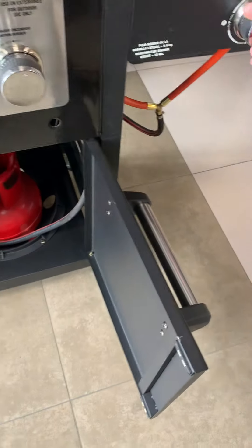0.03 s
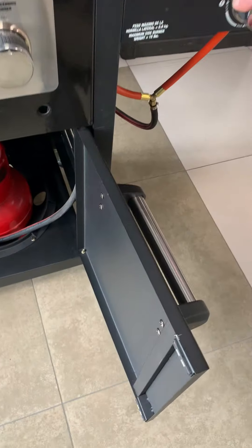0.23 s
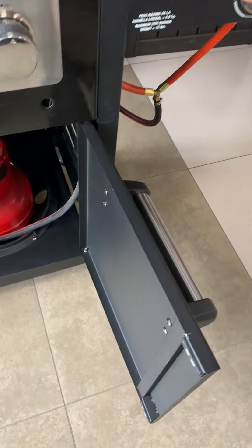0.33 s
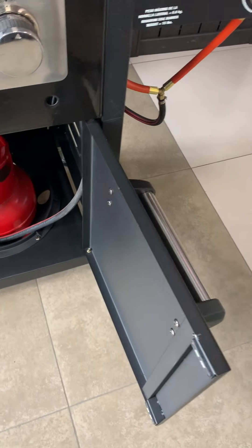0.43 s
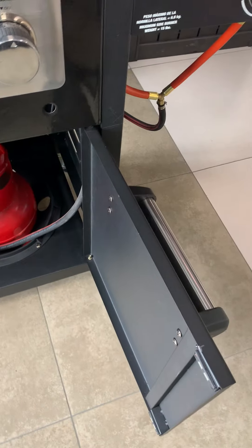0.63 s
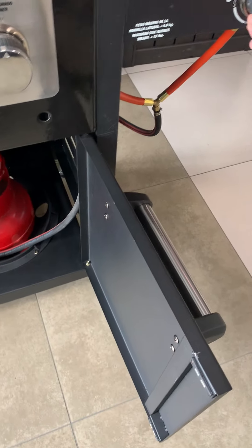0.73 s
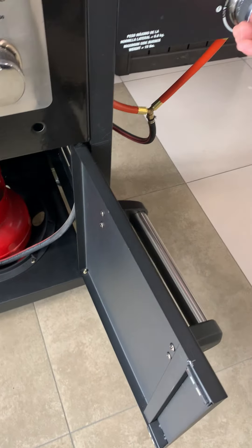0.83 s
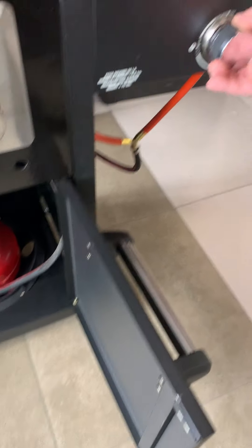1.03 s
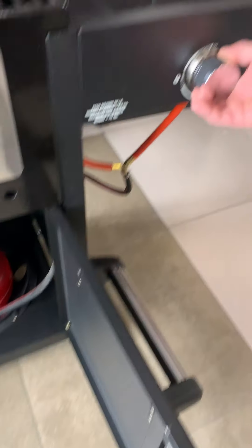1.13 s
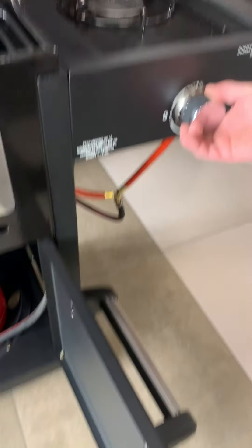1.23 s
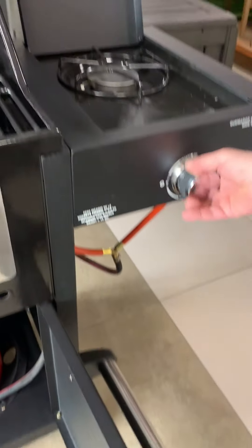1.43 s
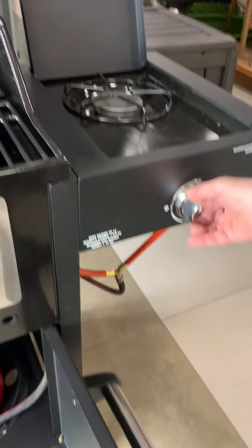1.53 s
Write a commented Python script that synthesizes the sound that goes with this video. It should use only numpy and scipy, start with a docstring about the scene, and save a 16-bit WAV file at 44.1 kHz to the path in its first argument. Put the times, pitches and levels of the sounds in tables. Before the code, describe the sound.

A sheet-steel grill cart clanks heavily, then ticks, clanks lightly and snaps over a low hum.

```python
"""A sheet-steel grill cart, handled in a hard-floored room: one heavy clank, then a tick, a lighter
clank and a sharp snap. Each blow cracks steel on steel and leaves the panels and parts ringing.
A hand then brushes the side shelf and takes hold of its knob. A low machine hum lies underneath.
Two closely spaced microphone ports pick it all up."""
import sys
import numpy as np
from scipy.fft import rfft, irfft, next_fast_len
from scipy.io import wavfile
from scipy.ndimage import map_coordinates

SR = 44100
rng = np.random.default_rng(int(sys.argv[2]) if len(sys.argv) > 2 else 0)


def unload_wav(signal):
    """Save mono or channel-first audio to the path in sys.argv[1] as 16-bit WAV at rate SR, clipped to [-1, 1]."""
    wavfile.write(
        sys.argv[1],
        SR,
        np.round(np.clip(np.atleast_2d(signal).T, -1, 1) * 32767).astype(np.int16),
    )


N = 70560


def amp(db):
    """Decibels to gain."""
    return 10 ** (np.asarray(db) / 20)


def unit(x):
    """Scaled to rms 1."""
    return x / np.sqrt(np.mean(x ** 2) + 1e-20)


def along(points, hz):
    """(Hz, value) points read on a log axis."""
    freqs, values = np.transpose(points)
    return np.interp(np.log(hz + 1), np.log(freqs + 1), values)


def fade(t, t60):
    """Exponential decay by 60 dB in t60 seconds."""
    return np.exp(-np.log(1000) * t / t60)


def since(start):
    """Seconds since start, zero before."""
    return np.maximum(np.arange(N) / SR - start, 0)


def wobble(rate):
    """A smooth random curve, rate knots a second."""
    return map_coordinates(rng.standard_normal(256), [np.arange(N) * rate / SR], mode="wrap")


def filtered(x, response):
    """x through a complex frequency response."""
    size = next_fast_len(N + SR // 2)
    return irfft(rfft(x, size) * response(np.fft.rfftfreq(size, 1 / SR)), size)[..., :N]


# Stereo width of the diffuse sound. Each row: frequency in Hz, correlation between the channels.
CHANNEL_LIKENESS = [(60, .9999), (130, .99), (280, .92), (700, .7), (1500, .75), (2800, .55), (4500, .98),
                    (8000, .98), (15000, .98)]
def noise(spectrum):
    """Coloured stereo noise of rms 1, nearly alike in both channels in bass and treble, wider between."""
    hz = np.fft.rfftfreq(N, 1 / SR)
    spread = np.arccos(np.clip(along(CHANNEL_LIKENESS, hz), -1, 1)) / 2
    coloured = rfft(rng.standard_normal((2, N))) * amp(along(spectrum, hz))
    mid, side = irfft(coloured * [np.cos(spread), np.sin(spread)], N)
    return unit(np.array([mid + side, mid - side]))


# The machine, heard in the room. Each row: pitch in Hz, level in dB.
HUM_TONES = [(31.3, -63), (62.7, -45), (94, -55.5), (156, -58.5), (250, -64.5), (850, -70.5)]
# Room tone. Each row: frequency in Hz, relative density in dB.
ROOM_TONE = [(20, -1), (60, -0.5), (110, -3), (250, -8.5), (500, -14.5), (1000, -27.5), (2000, -30.5),
             (4000, -41), (8000, -58), (15000, -52.5)]
def room_hum():
    """A low machine hum wavers in level and phase over soft room tone."""
    t, hum = np.arange(N) / SR, np.zeros(N)
    for hz, db in HUM_TONES:
        peak = amp(db + 3.1 * wobble(rate=22)) * np.sqrt(2)
        hum += peak * np.sin(2 * np.pi * (hz * t + rng.random()) + 0.2 * wobble(rate=16))
    return hum + amp(-48) * noise(ROOM_TONE)


# Scrapes and brushes on the cart. Each row: peak time, rise and fall in seconds,
# then body, rasp and hiss levels in dB.
STROKES = [(0.037, 0.032, 0.044, -47, -58, -46.5), (0.121, 0.034, 0.18, -52, -64, -59.5),
           (.203, .012, .003, -40, -38, -65), (0.2079, 0.00053, .003, -43, -21.5, -17),
           (1.125, 0.022, 0.16, -55, -65.5, -83.5), (1.222, 0.017, 0.023, -54.5, -61.5, -55),
           (1.424, 0.031, 0.076, -47, -59, -77)]
# The three colours of a rub. Each row: frequency in Hz, relative density in dB.
BODY_SPECTRUM = [(80, -21.5), (250, 8), (500, -4), (900, -1.5), (1400, -16.5), (3500, -27), (16000, -71)]
RASP_SPECTRUM = [(500, -16.5), (1300, 2.5), (2400, 2.5), (3600, 2), (5000, -3), (7500, -13.5),
                 (15000, -30.5)]
HISS_SPECTRUM = [(500, -27), (2000, -12.5), (4000, -2), (7000, 0.5), (9000, -1.5), (11500, -0.5),
                 (15500, -1.5)]
def rubs():
    """Sliding contacts swell and die: a dull body, a rasp and a dry hiss."""
    t, out = np.arange(N) / SR, np.zeros((2, N))
    spectra = [BODY_SPECTRUM, RASP_SPECTRUM, HISS_SPECTRUM]
    for peak_s, rise, fall, *levels_db in STROKES:
        envelope = np.exp(-(np.minimum(t - peak_s, 0) / rise) ** 2 - since(peak_s) / fall)
        out += envelope * sum(amp(db) * noise(colour) for db, colour in zip(levels_db, spectra))
    return out


# The contact before it is dulled. Each row: frequency in Hz, relative density in dB.
CLICK_SPECTRUM = [(300, -15), (1500, -13.5), (4000, -14), (7000, -6), (11000, 1), (13000, -4.5),
                  (15500, 6.5)]
def click(start, cutoff_hz, rise_s=0.0011, fall_s=0.00061):
    """The crack of steel meeting steel, straight to the microphone; softer contacts are duller."""
    t = since(start)
    envelope = (1 - np.exp(-(t / rise_s) ** 2)) * np.exp(-t / fall_s)
    crack = filtered(noise(CLICK_SPECTRUM)[0], lambda hz: 1 / (1 + (hz / cutoff_hz) ** 4))
    return unit(crack) * envelope / envelope.max()


def band(spectrum, centres_hz, k):
    """The sound in band k of a spectrum, crossfaded into the neighbouring bands."""
    hz = np.fft.rfftfreq(N, 1 / SR)
    weight = np.interp(np.log(hz + 1), np.log(centres_hz), np.eye(len(centres_hz))[k])
    return irfft(spectrum * weight, N)


# The panels before a blow sets their band levels. Each row: frequency in Hz, relative density in dB.
PANEL_SPECTRUM = [(60, -19), (110, -14), (160, -4.5), (200, -1), (300, 3), (400, -3.5), (600, -0.5),
                  (900, -0.5), (1400, -9), (1950, -12), (2500, -13.5), (4000, -15), (5000, -14),
                  (7300, -14), (9000, -11), (10600, -12), (13000, -11.5), (15500, -13)]
# Centres of those five bands in Hz, low to high.
PANEL_BANDS = [250, 900, 2800, 7000, 14000]
# The panels' tail. Each row: frequency in Hz, t60 in seconds before stretching.
PANEL_DECAY = [(150, 1), (400, 1), (1000, 0.88), (2500, 0.67), (7000, 0.52), (11000, 0.27), (15000, 0.22)]
# Ringing spreads through the sheet. Each row: frequency in Hz, rise time in seconds.
PANEL_BLOOM = [(150, 0.023), (300, 0.0025), (900, 0.015), (2500, 0.006), (10000, 0.00071)]
def panels(start, stretch, band_db, cluster_db=3, cluster_width_hz=55):
    """Countless sheet-metal modes: the treble starts at once and dies first, the bass lingers."""
    t, out = since(start), np.zeros((2, N))
    hz = np.fft.rfftfreq(N, 1 / SR)
    # The dense modes bunch up unevenly along the spectrum.
    clusters = map_coordinates(rng.standard_normal(2048), [hz / cluster_width_hz], mode="wrap")
    modes = rfft(noise(PANEL_SPECTRUM)) * amp(cluster_db * clusters * np.minimum(hz / 1500, 1))
    gains_db = [db - 10 * np.log10(np.mean(band(modes[0], PANEL_BANDS, k) ** 2))
                for k, db in enumerate(band_db)]
    modes *= amp(along(list(zip(PANEL_BANDS, gains_db)), hz))
    early_gain = amp(1.5)  # a quick first decay, relative to the tail
    early = early_gain * fade(t, t60=0.16 * stretch)
    centres_hz = np.geomspace(150, 15000, 7)
    for k, centre in enumerate(centres_hz):
        tail = fade(t, along(PANEL_DECAY, centre) * stretch)
        bloom = 1 - np.exp(-t / along(PANEL_BLOOM, centre))
        out += band(modes, centres_hz, k) * bloom * (early + tail) / (1 + early_gain)
    return out


def ringing(start, pitches, rings, reflected=0.83):
    """One part's strongest modes; reflections make each swell and fade, the high ones faster."""
    t, out = since(start), np.zeros((2, N))
    direct = np.sqrt(1 - reflected ** 2)
    for hz, (db, t60) in zip(pitches, rings):
        live = (t > 0) & (t < t60)
        age = t[live]
        knots = rng.standard_normal((512, 2)) @ [1, 1j]
        knots_per_s = 20 + 16 * hz / 1000
        waver = np.interp(age * knots_per_s, np.arange(len(knots)), knots)
        tone = np.imag(np.exp(2j * np.pi * hz * age) * (direct + reflected * waver))
        rise_s = 0.0045 * min(1, 1000 / hz)
        out[:, live] += amp(db) * (1 - np.exp(-age / rise_s)) * fade(age, t60) * tone
    return out


# Modes of the sheet-steel body, stiff frame, side shelf and a small steel fitting. PITCHES are in Hz.
# Each row of RINGS: that mode's relative level in dB, t60 in seconds.
BODY_PITCHES = [157, 200, 266, 288, 503, 559, 654, 836, 852, 880, 1179, 1248, 1463, 1601]
BODY_RINGS = [(-11, 0.85), (-8.5, 1), (-12.5, .8), (-6, .55), (-8, .6), (-7.5, 0.71), (-8.5, 0.86),
              (-4.5, 0.42), (3.5, 0.4), (1.5, .35), (-9.5, .45), (-9.5, 0.41), (-12, 0.39), (-12.5, 0.26)]
FRAME_PITCHES = [2258, 2455, 3385, 4045, 6874, 8400, 10162, 10366, 10485, 10650, 11992]
FRAME_RINGS = [(-7, 0.85), (1, 0.25), (-8, 0.8), (5, .27), (-6, 0.25), (-6, .22), (-1, .2), (4, .2),
               (-1.5, .2), (-1.5, .2), (-2.5, .22)]
SHELF_PITCHES = [777, 845, 897, 975, 1255, 1595, 1733, 1905, 6326, 7470]
SHELF_RINGS = [(-1, 0.11), (1, 0.35), (-1.5, 0.23), (3, 0.38), (-3.5, .22), (-9.5, 0.48), (-12, 0.59),
               (-10.5, 0.25), (-12, 0.15), (-7.5, 0.2)]
FITTING_PITCHES = [1290, 1338, 1577, 1655, 3618, 5803, 7171, 7537, 10690, 11390]
FITTING_RINGS = [(0, 0.28), (-1, 0.17), (-12, .7), (-10, .5), (-10, 0.26), (-9, .18), (-5.5, 0.39),
                 (-3.5, .2), (-5, .16), (-4.5, 0.21)]
# Blows on the cart. Each row: start in seconds, click level in dB, click cutoff in Hz, panel decay
# stretch as a factor, five panel band levels in dB, then body, frame, shelf and fitting gains in dB.
CART_BLOWS = [(.2100, -9, 14100, 1, -20, -24, -20, -22, -16.5, -26, -29, -77, -70),
              (.2340, -20, 4040, 0.444, -37, -16.5, -32, -30, -54, -24.5, -51.5, -55, -64),
              (0.5234, -25, 6400, 0.6, -28.5, -35.5, -41, -42.5, -47, -41.5, -75, -85, -45),
              (0.5839, -42, 8950, 0.24, -46, -23.5, -28, -36, -46, -39, -66, -65, -83),
              (.5925, -14, 16900, 0.77, -41, -28, -35, -26.5, -28.5, -39.5, -66, -30.5, -40),
              (0.7622, -13, 14300, 0.69, -40, -41, -36, -33, -29, -66.5, -62, -49.5, -40),
              (1.3770, -58, 3000, 0.42, -54, -49.5, -59.5, -79, -87.5, -67.5, -86.5, -79, -87),
              (1.4020, -54, 4000, 0.59, -42, -50.5, -53.5, -68, -89, -55, -90, -78, -90),
              (1.4611, -48.5, 17000, 0.38, -40.5, -65, -64.5, -63, -74, -67, -78, -76, -90),
              (1.4880, -41, 3870, 0.44, -57.5, -43.5, -46.5, -56, -56.5, -66, -103, -56, -71.5)]
def blows():
    """Each blow cracks, shakes the panels and rings the parts near it."""
    parts = [(BODY_PITCHES, BODY_RINGS), (FRAME_PITCHES, FRAME_RINGS),
             (SHELF_PITCHES, SHELF_RINGS), (FITTING_PITCHES, FITTING_RINGS)]
    out = np.zeros((2, N))
    for start, click_db, cutoff_hz, stretch, *levels_db in CART_BLOWS:
        band_db, part_db = levels_db[:len(PANEL_BANDS)], levels_db[len(PANEL_BANDS):]
        out += amp(click_db) * click(start, cutoff_hz)
        out += panels(start, stretch, band_db)
        out += sum(amp(db) * ringing(start, *part) for db, part in zip(part_db, parts))
    return out


def scene():
    """Cart, hand and room, heard from where the microphone stands."""
    return blows() + rubs() + room_hum()


# Phase between the ports. Each row: frequency in Hz, lead of the left port in radians.
PORT_LEAD = [(0, 0), (300, -.1), (900, -.45), (1600, 0), (2600, 2.2), (3500, 1.1), (4200, 2), (4850, 3.14),
             (6400, 5.9), (7200, 6.4), (9000, 9.42), (10900, 12.3), (11600, 12.8), (13250, 15.7),
             (15000, 18.6), (16500, 18.85)]
def record(dry, top_hz=15900):
    """The two closely spaced ports hear each pitch out of step; the top is cut off steeply."""
    def response(hz):
        lead = np.interp(hz, *np.transpose(PORT_LEAD))
        ports = np.array([np.ones_like(hz), np.exp(-1j * lead)])
        return ports / (1 + (hz / top_hz) ** 120)
    return filtered(dry, response)


dry = scene()
out = record(dry)
unload_wav(out)
```